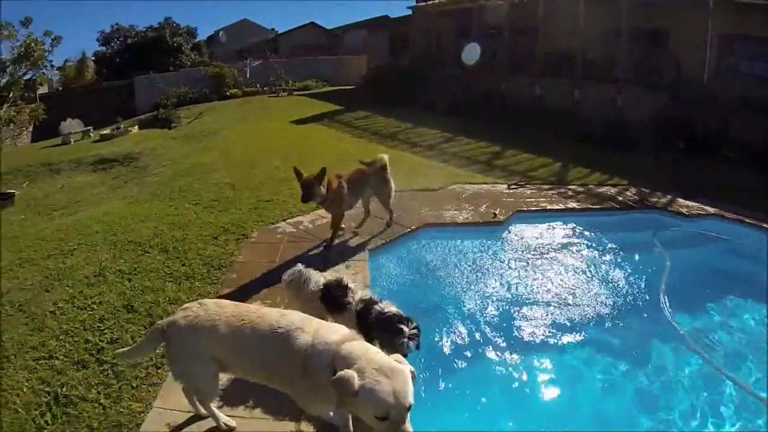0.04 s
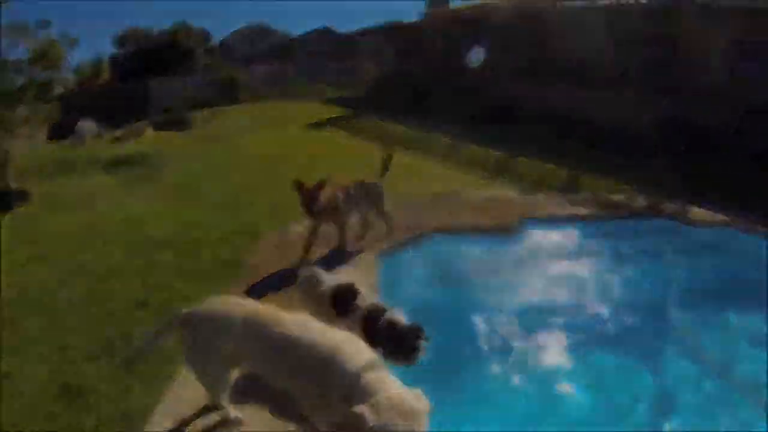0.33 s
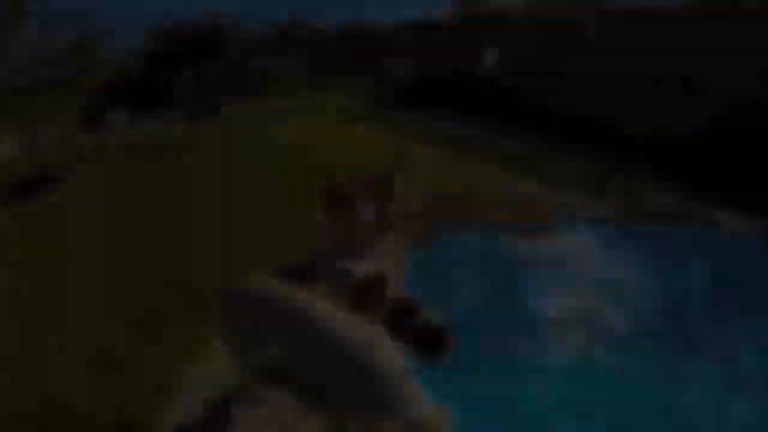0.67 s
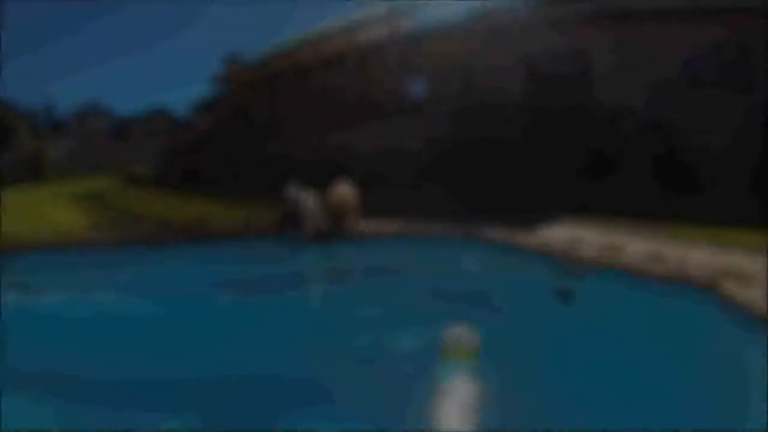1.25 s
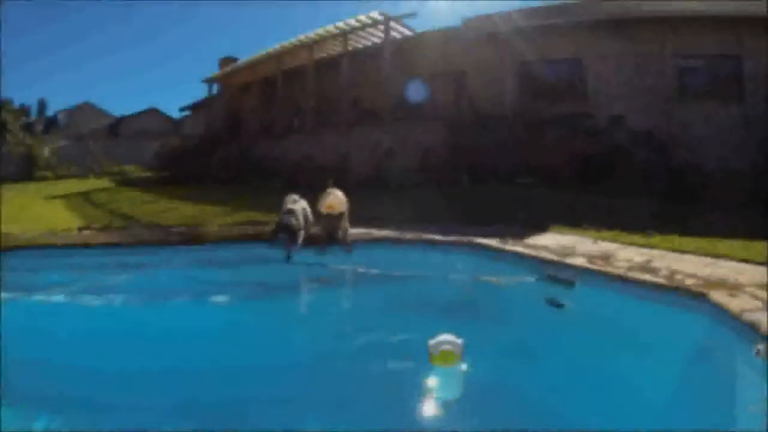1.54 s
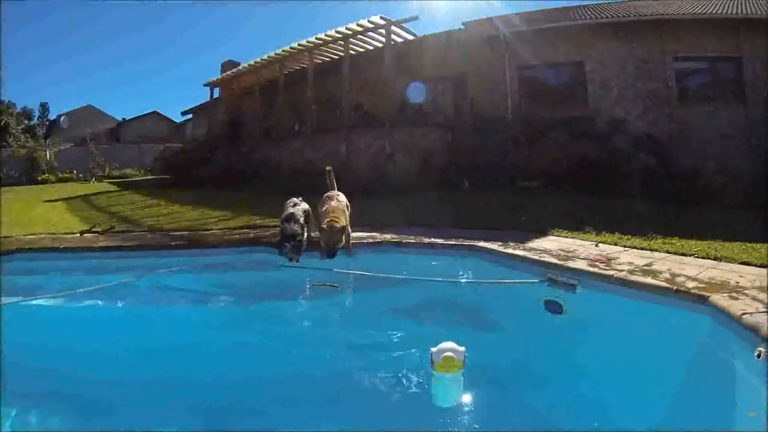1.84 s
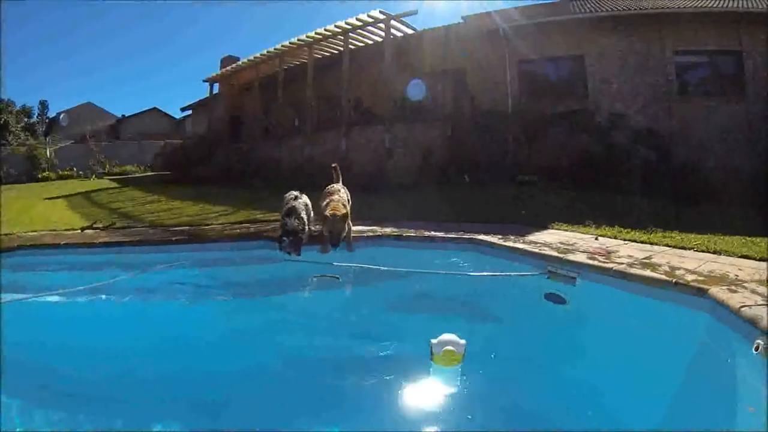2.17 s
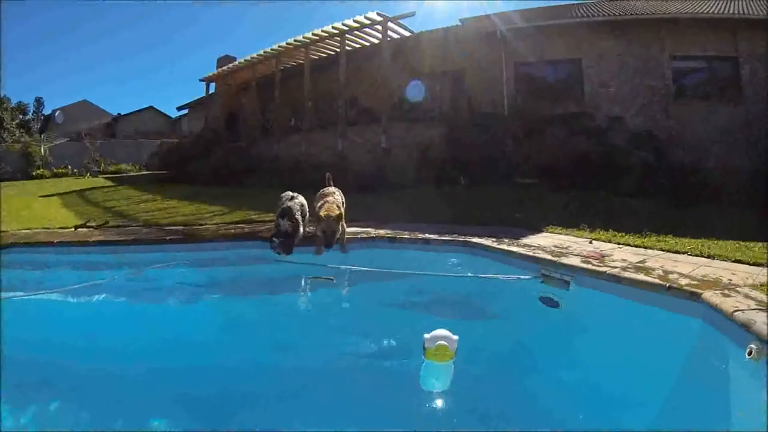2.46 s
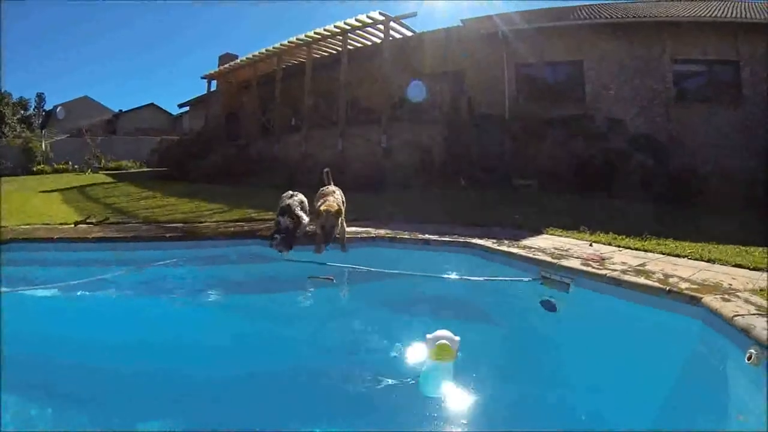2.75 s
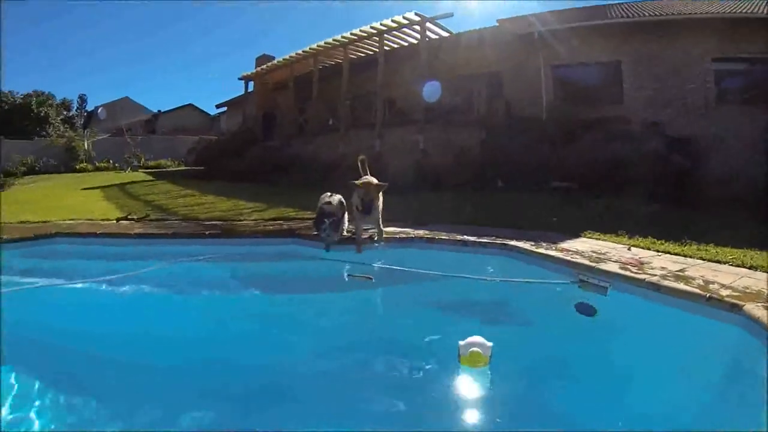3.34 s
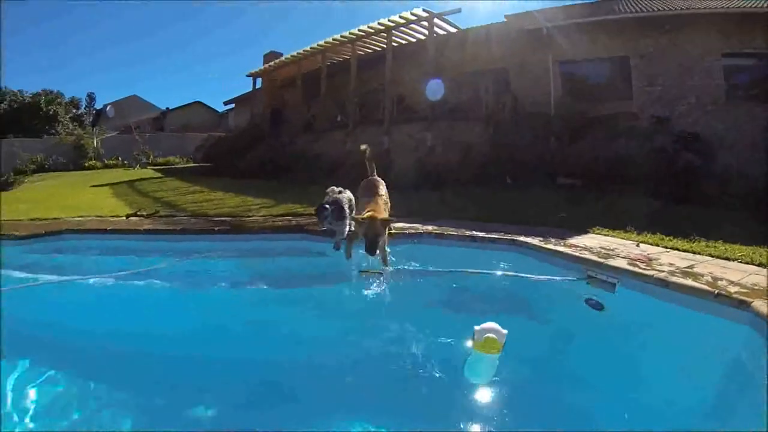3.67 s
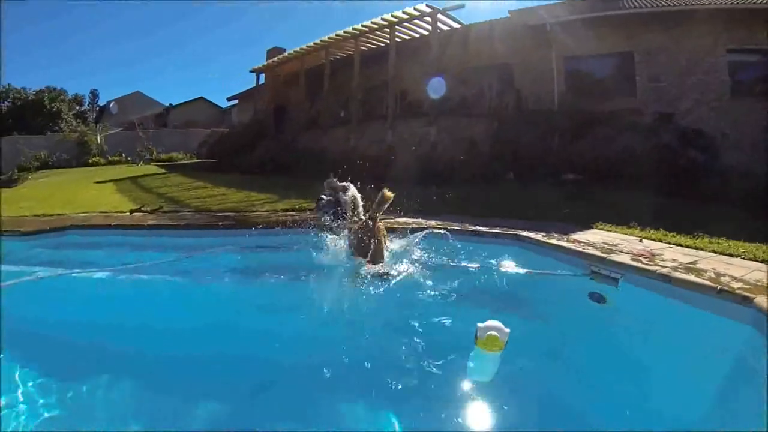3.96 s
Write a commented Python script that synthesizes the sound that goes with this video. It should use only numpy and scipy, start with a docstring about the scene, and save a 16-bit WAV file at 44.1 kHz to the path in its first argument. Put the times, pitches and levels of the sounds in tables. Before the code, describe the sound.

A dog splashes into a backyard pool with quick slaps, bubbles and spray. Before that, light wind rumbles on a microphone just above the water, with faint ripples, soft bumps on its case and a steady hiss.

```python
"""A quiet backyard pool, the microphone inside a camera's waterproof case held just over the water.
From the start, light wind rumbles on the case over a steady hiss and a faint electronic whine.
For three seconds ripples lap and plip close by, and the case takes a few bumps, knocks and ticks.
At 3.2 s a dog's paws hit the water at the far edge and it plunges in: a run of slaps, ringing
bubbles and spray, answered faintly by the walls around the pool."""
import sys
import numpy as np
from scipy import signal
from scipy.fft import rfft, irfft, next_fast_len
from scipy.io import wavfile
from scipy.ndimage import uniform_filter1d, map_coordinates

SR = 44100
rng = np.random.default_rng(int(sys.argv[2]) if len(sys.argv) > 2 else 0)


def file_out(sig):
    """Save sig as 16-bit WAV at sys.argv[1]."""
    # one column per channel
    cols = np.atleast_2d(sig).T
    # limit, then scale
    lim = np.clip(cols, -1, 1)
    pcm = np.round(lim * 32767).astype(np.int16)
    wavfile.write(sys.argv[1], SR, pcm)


N = 176400

# Paws and body hitting the water at the far edge. Each row: start in seconds, relative level in dB,
# gulp and spray offsets in dB, decay in seconds.
DOG_SLAPS = [(3.232,-39.5,-18,-14.5,0.0051), (3.267,-46.5,-21,-13,0.0057), (3.306,-49,-17,-17,0.0033),
             (3.350,-49,-24,-16,0.0054), (3.399,-39,-17,-15.5,0.0063), (3.406,-45,-22,-6.5,0.0094),
             (3.434,-36,-21.5,-17,0.0065), (3.471,-34.5,-18,-13.5,0.0053), (3.483,-44,-26,-30,.007),
             (3.526,-39,-18,-15.5,0.0089), (3.541,-39,-9.5,-24,.007), (3.548,-37.5,-13,-24,0.0056),
             (3.560,-37.5,-15,-28,0.0043), (3.612,-41.5,-9.5,-18,0.011), (3.638,-41,-26,-24,0.0055),
             (3.667,-45,-15,-14,0.0075), (3.7,-40,-26,-19,0.005), (3.709,-33.5,-18,-23,0.0065),
             (3.724,-40,-23,-20,0.0082), (3.776,-41.5,-10,-18.5,0.017), (3.795,-37,-20.5,-20.5,0.0068),
             (3.821,-44,-16,-22,0.011), (3.854,-41,-14,-24,0.007), (3.885,-35,-16,-22,0.004),
             (3.898,-44,-25,-21,0.0042), (3.919,-41,-24,-28,0.0076), (3.968,-44,-14,-18,0.0065),
             (3.989,-39,-12,-28,0.003)]
# Churned water between the slaps. Each row: time in seconds, relative level in dB.
CHURN_LEVELS = [(3.2, -66.5), (3.25, -78), (3.38, -59), (3.42, -51), (3.56, -58), (3.59, -55),
                (3.69, -55.5), (3.76, -53.5), (3.81, -49), (3.9, -52.5), (3.95, -58.5), (4.0, -56.5)]
# The splash as it sounds through the case. Each row: frequency in Hz, relative gain in dB.
PAW_COLOUR = [(800, -48.5), (1150, -18.5), (1265, 2.5), (1345, -1.5), (1450, -2.5), (1580, -1), (1800, -5),
              (2200, -8), (2600, -14.5), (3300, -54.5)]
PLUNGE_COLOUR = [(800, -45.5), (1180, -20), (1275, 0), (1370, -1), (1470, -5.5), (1640, -1), (1730, -1.5),
                 (1820, -5.5), (2100, -10), (2600, -18.5), (3300, -47)]
GULP_COLOUR = [(60, -10), (130, 1), (280, -6.5), (420, -2), (550, -9.5), (690, -0.5), (860, -7), (1020, -1),
               (1150, -9), (1500, -40.5)]
SPRAY_COLOUR = [(1900, -59), (2500, -12), (2900, -3.5), (3450, 4), (3900, 0), (4300, -17), (4750, -10),
                (5100, -7), (6800, -16), (10000, -21), (15000, -54)]
# Air trapped by ripples and by the dog. Each row: start in seconds, pitch in Hz, relative level in dB.
PLIP_BUBBLES = [(0.399,1455,-50), (1.242,2960,-53), (1.673,1340,-47.5), (1.675,1597,-43.5),
                (1.694,1740,-62), (3.071,1710,-50.5), (3.077,2300,-50), (3.133,1640,-54),
                (3.438,1550,-37.5), (3.439,683,-49), (3.47,1230,-40), (3.498,560,-60), (3.529,546,-51.5),
                (3.543,990,-44), (3.548,1314,-36), (3.616,1470,-42), (3.624,1300,-45), (3.709,1674,-36),
                (3.708,1330,-38.5), (3.711,660,-51), (3.796,1554,-37.5), (3.798,510,-54.5),
                (3.859,1600,-42), (3.886,1715,-40), (3.922,1700,-46)]
# Small waves near the microphone. Each row: centre in seconds, level in dB, width in seconds.
WAVE_LAPS = [(0.238,-67,.025), (.55,-67,0.015), (.79,-68,0.013), (1.06,-70,0.048), (1.79,-69.5,0.016),
             (2.305,-62,0.0048), (2.85,-65.5,0.01)]
# Drops landing, and ticks on the case. Each row: start in seconds, level in dB.
WATER_DROPS = [(3.235, -58), (3.415, -63), (3.436, -65), (3.487, -63), (3.798, -59)]
CASE_TICKS = [(0.119, -51), (2.722, -43)]
# The tone of a lap, a drop and a tick. Each row: frequency in Hz, relative gain in dB.
LAP_COLOUR = [(600,-20), (1300,1), (1800,-15), (2600,6), (3800,5.5), (4400,-9), (6500,-12), (8000,-12),
              (15000,-31)]
DROP_COLOUR = [(2000, -20), (5000, -2), (8000, 4), (12000, -5), (15000, -19)]
TICK_COLOUR = [(700,-42), (1200,-8), (1700,-0.5), (2300,-7.5), (3500,-8.5), (4500,-8.5), (6700,-18),
               (7800,-20), (15000,-58)]
# Soft bumps on the case. Each row: centre in seconds, level in dB, width in seconds.
CASE_BUMPS = [(0.418,-41,0.0061), (0.454,-31,0.013), (0.532,-32.5,0.007), (.575,-46,0.0057),
              (1.32,-29.5,0.0042), (2.276,-33.5,0.0051), (2.576,-34,0.004), (2.642,-34.5,0.0042)]
# Firmer knocks on the case. Each row: centre in seconds, level in dB, pitch in Hz.
CASE_KNOCKS = [(1.505,-40.5,130), (2.247,-40,90), (2.598,-36,89.5), (2.639,-35,152), (2.690,-41,210),
               (2.781,-39.5,108), (2.955,-42,90)]
# Gusts on the case. Each row: time in seconds, level in dB.
GUST_LEVELS = [(.11,-38.5), (.16,-55), (.21,-37), (.3,-43.5), (.44,-38), (.55,-39.5), (.65,-42), (.9,-50),
               (.97,-39), (1.07,-48), (1.17,-41), (1.25,-52), (1.34,-41.5), (1.45,-46), (2.15,-48),
               (2.27,-41), (2.36,-42.5), (2.53,-47), (2.6,-38.5), (2.8,-45.5), (3.15,-44.5), (3.45,-51),
               (3.9,-51), (4.0,-40)]
# Deep buffeting, the softer rush above it, and hiss. Each row: frequency in Hz, relative gain in dB.
BUFFET_COLOUR = [(5,-20), (12,-6), (22,6.5), (36,-3.5), (50,-4), (70,-11), (110,-25), (200,-45),
                 (400,-67.5)]
RUSH_COLOUR = [(30,-10.5), (60,-5), (110,-1), (180,-9.5), (300,-19), (600,-31.5), (2000,-65.5)]
HISS_COLOUR = [(100,2.5), (300,-1), (600,-6), (1100,-10), (1300,-9), (1550,-6), (1900,-13.5), (2500,-14),
               (2800,-11), (3000,-6.5), (3300,-13.5), (3850,-15.5), (4300,-17.5), (4920,-19), (5070,-10),
               (5230,-17.5), (6200,-18), (7200,-22.5), (9300,-21.5), (9900,-15.5), (10350,-15),
               (10900,-24.5), (11600,-28.5), (15000,-25.5)]
# Tones from the camera's circuits. Each row: frequency in Hz, level in dB.
WHINE_TONES = [(5071,-94), (6114,-94), (6594,-91.5), (9351,-100), (9830,-101), (10429,-90)]


def splash():
    """Across the pool, each slap throws droplets, a hollow gulp and spray, and leaves churned water."""
    wash_db, wash_decay_s, plunge_s = -15.5, 0.037, 3.58
    t = np.arange(SR // 3) / SR
    slap_power, gulp_power, spray_power = np.zeros((3, N))
    for start, db, gulp_db, spray_db, decay in DOG_SLAPS:
        rise = 1 - np.exp(-t / (0.3 * decay))
        wash = amp(wash_db) * np.exp(-t / wash_decay_s)
        power = rise ** 2 * (np.exp(-2 * t / decay) + wash ** 2)
        add(slap_power, start, amp(db - 0.5) ** 2 * power)
        add(gulp_power, start, amp(db + gulp_db + 6) ** 2 * power)
        add(spray_power, start, amp(db + spray_db + 5.5) ** 2 * power)
    churn = amp(curve(CHURN_LEVELS) + 1.94 * wobble(70))
    droplets = np.sqrt(slap_power + (amp(-3) * churn) ** 2) * crackle(spiky=0.51, steady_s=0.0039)
    gulp = np.sqrt(gulp_power + (amp(-9) * churn) ** 2) * crackle(spiky=0.28, steady_s=0.0032)
    spray = np.sqrt(spray_power + (amp(-11.5) * churn) ** 2) * crackle(spiky=0.42, steady_s=0.012)
    plunged = np.arange(N) / SR >= plunge_s  # the slaps switch colour as the dog goes in
    water = coloured(~plunged * droplets, PAW_COLOUR) + coloured(plunged * droplets, PLUNGE_COLOUR)
    water += coloured(gulp, GULP_COLOUR) + coloured(spray, SPRAY_COLOUR)
    water += amp(7.5) * bubbles(churn, centre_hz=1623, spread=0.172, cycles=10, rise=0.023, count=110)
    water += amp(-1.5) * bubbles(churn, centre_hz=3180, spread=0.12, cycles=11, rise=0.02, count=50)
    water += amp(-1) * bubbles(churn, centre_hz=639, spread=0.34, cycles=7.1, rise=0.018, count=30)
    return water


def bubbles(churn, centre_hz, spread, cycles, rise, count):
    """Small bubbles around the dog ring and rise in pitch, louder when the water churns harder."""
    out, t = np.zeros(N), np.arange(SR // 25) / SR
    starts = rng.uniform(CHURN_LEVELS[0][0], N / SR - .001, count)
    pitches = centre_hz * np.exp(spread * rng.standard_normal(count))
    for start, hz, strength in zip(starts, pitches, rng.uniform(size=count)):
        age = t * hz / cycles  # in decay times
        envelope = np.exp(-age) * (1 - np.exp(-t * hz))
        ring = np.sin(2 * np.pi * hz * t * (1 + rise * age))
        add(out, start, strength * churn[int(start * SR)] * envelope * ring)
    return out


def plips():
    """Single trapped bubbles, each a short rising note; large, low ones ring longer."""
    attack_s, decay_cycles, rise_per_s = 0.00066, 4.6, 4.1
    out, t = np.zeros(N), np.arange(SR // 20) / SR
    for start, hz, db in PLIP_BUBBLES:
        ring = np.sin(2 * np.pi * hz * t * (1 + rise_per_s * t / 2))
        envelope = (1 - np.exp(-t / attack_s)) * np.exp(-t * hz / decay_cycles)
        add(out, start, amp(db + 6) * envelope * ring)
    return out


def laps():
    """Small waves swish softly near the microphone before the jump."""
    t = np.arange(N) / SR
    swell = sum(amp(db) * np.exp(-.5 * ((t - centre) / width) ** 2) for centre, db, width in WAVE_LAPS)
    return coloured(swell * crackle(spiky=1.0, steady_s=0.021), LAP_COLOUR)


def snaps(rows, colour, decay_s):
    """Tiny hard contacts, a drop landing or a tick on the case, each a very short burst of noise."""
    out, t = np.zeros(N), np.arange(SR // 50) / SR
    for start, db in rows:
        add(out, start, amp(db) * rng.standard_normal(len(t)) * np.exp(-t / decay_s))
    return coloured(out, colour)


def bumps():
    """Right at the microphone, each bump pushes and pulls the case once."""
    out, t = np.zeros(N), np.arange(N) / SR
    for centre, db, width in CASE_BUMPS:
        offset = (t - centre) / width
        out += amp(db) * 2 * offset / (1 + offset ** 2) ** 1.038
    return out


def knocks():
    """Each knock flexes the case around the microphone in a dull, very short thud."""
    decay_cycles = 0.35
    out, t = np.zeros(N), np.arange(N) / SR
    for centre, db, hz in CASE_KNOCKS:
        cycles = (t - centre) * hz
        out += amp(db) * np.exp(-np.abs(cycles) / decay_cycles) * np.cos(2 * np.pi * cycles)
    return out


def wind():
    """Wind buffets the case, swelling and fluttering with each gust; the rush above follows a little."""
    gust_db = curve(GUST_LEVELS)
    flutter_db = 2.5 * wobble(20)
    buffet = unit(amp(flutter_db) * coloured(rng.standard_normal(N), BUFFET_COLOUR))
    rush = coloured(rng.standard_normal(N), RUSH_COLOUR)
    rush_db = -63 + 0.11 * (gust_db - gust_db.mean()) + 0.52 * flutter_db
    return amp(gust_db) * buffet + amp(rush_db) * rush


def yard_echo(sound):
    """The walls around the pool answer with a short, diffuse tail."""
    t60_s, build_s = 0.091, 0.0073
    t = np.arange(SR // 2) / SR
    tail = rng.standard_normal(len(t)) * amp(-60 * t / t60_s) * (1 - np.exp(-t / build_s))
    return signal.fftconvolve(sound, tail / np.linalg.norm(tail))[:N]


def hiss():
    """Steady air and microphone noise."""
    return amp(-61 + 0.17 * wobble(8.25)) * coloured(rng.standard_normal(N), HISS_COLOUR)


def electronics():
    """The camera's circuits leak a faint whine and a regular blip of interference."""
    blip_at_s, period_s, width_s, blip_hz, blip_db = .297, .25, 0.0035, 5500, -70.5
    t = np.arange(N) / SR
    whine = sum(amp(db) * np.sqrt(2) * np.sin(2 * np.pi * hz * t + 0.17 * wobble(28))
                for hz, db in WHINE_TONES)
    from_blip_s = (t - blip_at_s + period_s / 2) % period_s - period_s / 2
    envelope = np.exp(-.5 * (from_blip_s / width_s) ** 2)
    return whine + amp(blip_db) * envelope * np.sin(2 * np.pi * blip_hz * t)


def crackle(spiky, steady_s):
    """Dense droplet impacts of uneven size, at an even mean level."""
    size = np.repeat(rng.standard_normal(N // 8 + 1), 8)[:N]
    impacts = rng.standard_normal(N) * np.exp(spiky * size)
    mean_power = np.abs(uniform_filter1d(impacts ** 2, max(2, int(steady_s * SR))))
    return impacts / np.sqrt(mean_power + 1e-9)


def coloured(x, points):
    """Causal filter of unit energy through (Hz, dB) points."""
    size = 4096
    hz, db = np.transpose(points)
    gain = amp(np.interp(np.log(np.fft.rfftfreq(size, 1 / SR) + 1), np.log(hz + 1), db))
    cepstrum = irfft(np.log(gain))
    cepstrum[1:size // 2] *= 2  # fold onto positive time for minimum phase
    cepstrum[size // 2 + 1:] = 0
    ring = irfft(np.exp(rfft(cepstrum)))
    return signal.fftconvolve(x, ring / np.linalg.norm(ring))[:len(x)]


def amp(db):
    """Decibels to gain."""
    return 10 ** (np.asarray(db) / 20)


def unit(x):
    """Scale to rms 1."""
    return x / np.sqrt(np.mean(x ** 2) + 1e-20)


def curve(rows):
    """(seconds, value) points as one value per sample."""
    return np.interp(np.arange(N) / SR, *np.transpose(rows))


def wobble(rate):
    """A smooth random curve, rate knots a second."""
    return map_coordinates(rng.standard_normal(int(N * rate / SR) + 4), [np.arange(N) * rate / SR])


def add(track, start_s, sound):
    """Mix a sound into the track at start_s."""
    part = track[round(start_s * SR):][:len(sound)]
    part += sound[:len(part)]


def scene():
    """One microphone just over the pool: water and its echo, noises of the case, hiss and whine."""
    water = splash() + plips() + laps() + snaps(WATER_DROPS, DROP_COLOUR, decay_s=0.0026)
    case = snaps(CASE_TICKS, TICK_COLOUR, decay_s=0.0019) + bumps() + knocks() + wind()
    return (water + amp(-15) * yard_echo(water) + case + hiss() + electronics())[None]


def record(dry):
    """The microphone opens after a moment of silence; nothing passes above the band limit."""
    start_s, fade_s, top_hz = .107, .003, 15400
    live = dry * np.clip((np.arange(N) / SR - start_s) / fade_s, 0, 1)
    size = next_fast_len(N + SR // 2)
    passband = np.fft.rfftfreq(size, 1 / SR) < top_hz
    return irfft(rfft(live, size) * passband, size)[..., :N]


dry = scene()
out = record(dry)
file_out(out)
```